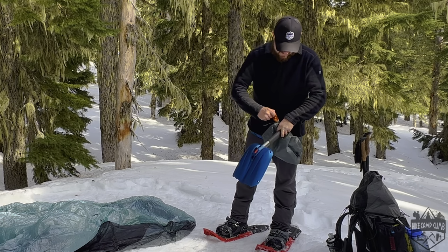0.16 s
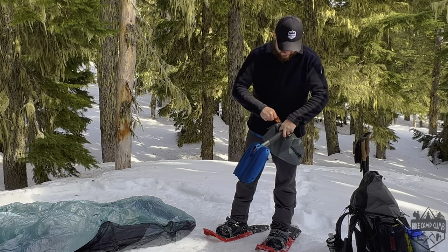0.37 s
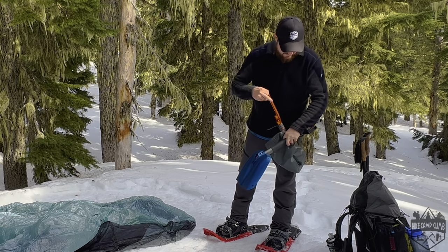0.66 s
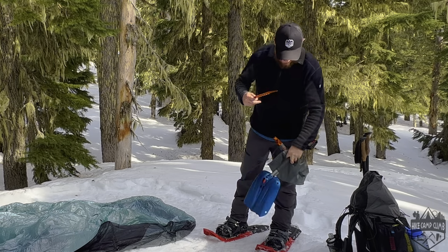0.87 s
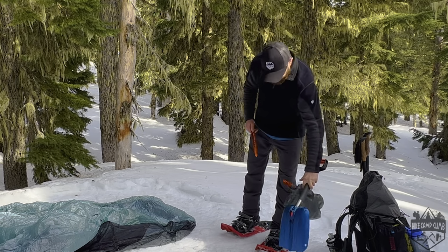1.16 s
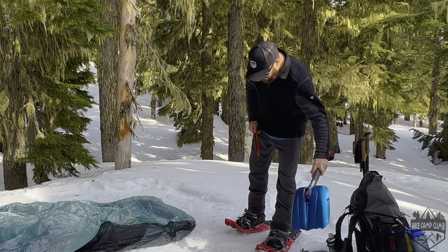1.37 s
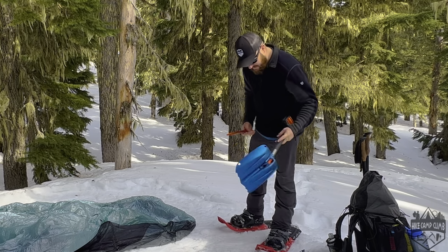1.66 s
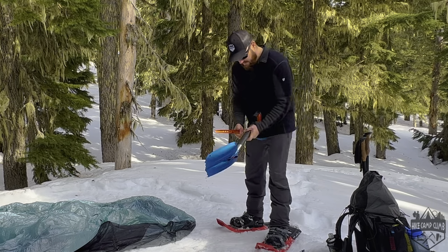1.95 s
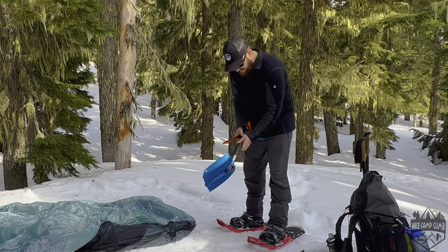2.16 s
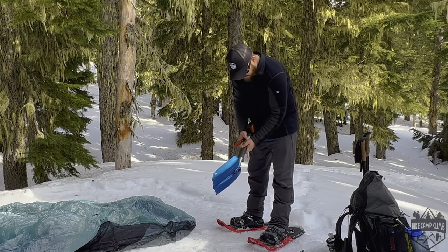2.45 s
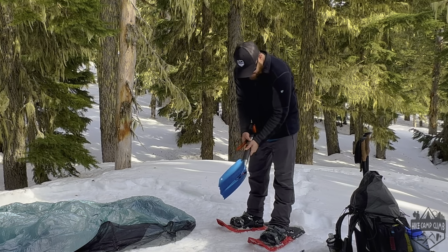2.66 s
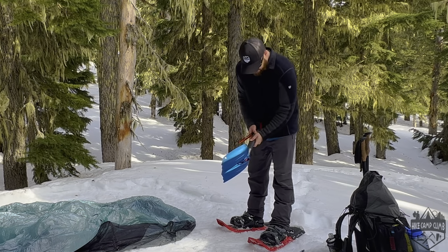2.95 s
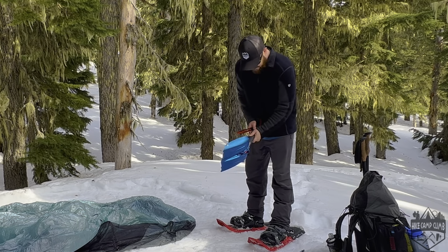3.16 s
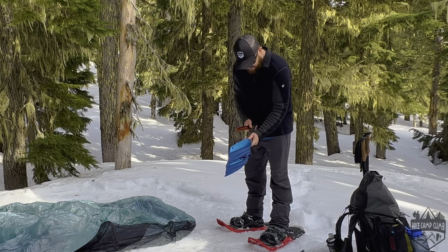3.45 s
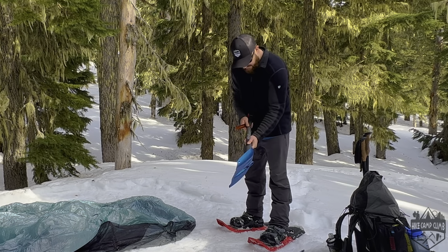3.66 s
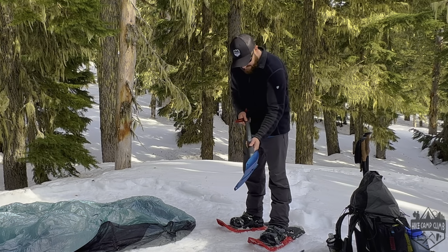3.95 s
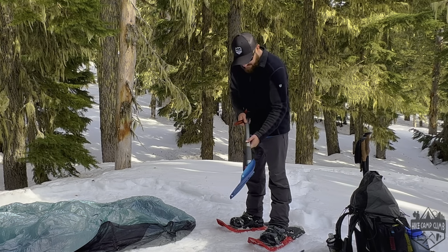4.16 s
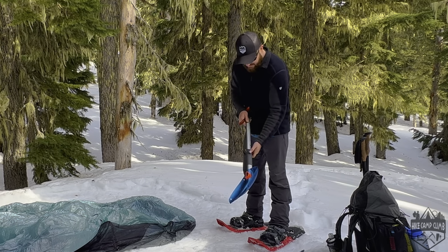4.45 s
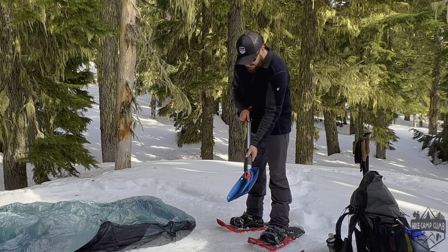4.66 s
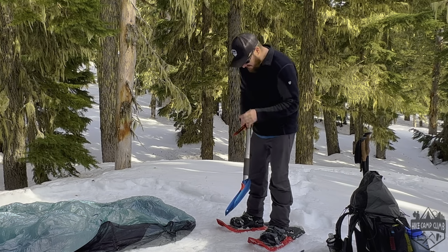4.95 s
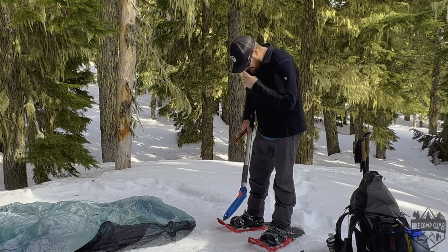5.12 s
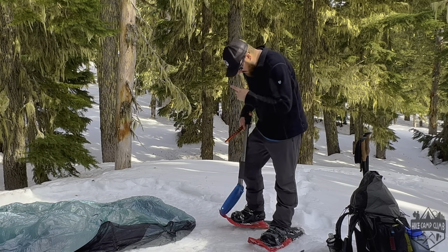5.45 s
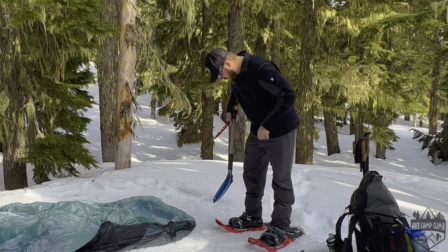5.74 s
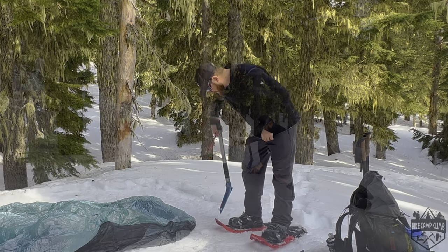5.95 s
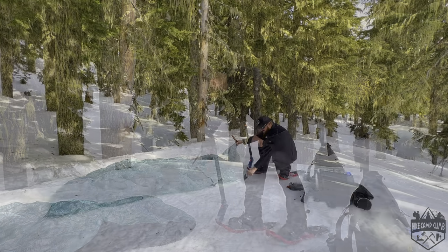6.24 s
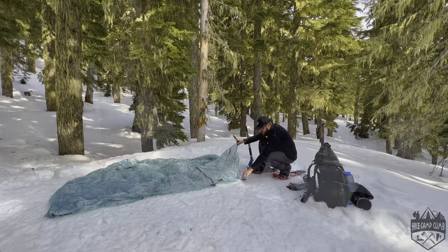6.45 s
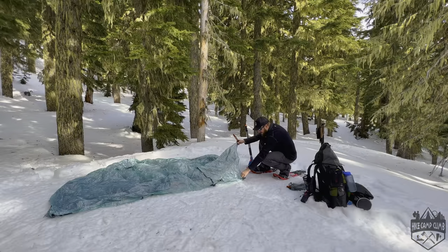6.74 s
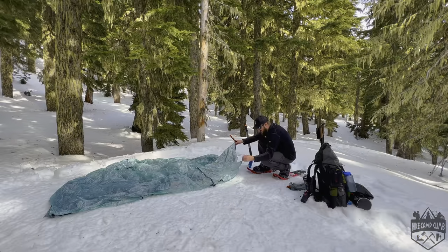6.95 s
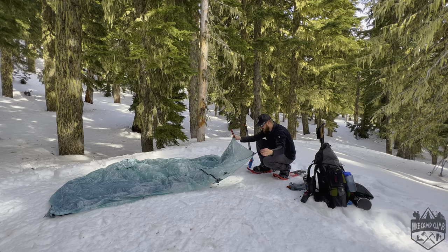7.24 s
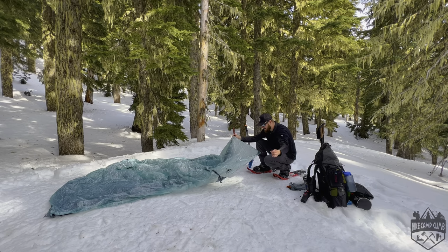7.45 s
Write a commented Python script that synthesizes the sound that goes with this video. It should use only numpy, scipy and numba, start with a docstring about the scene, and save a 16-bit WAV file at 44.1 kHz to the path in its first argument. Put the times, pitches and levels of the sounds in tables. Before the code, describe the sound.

Close outdoor handling of a metal shovel: hollow clanks, sharp clicks, gritty fabric and snow scrapes, a few soft thuds, then quiet nylon rustling and a fast ratchet.

```python
"""Shovel and nylon gear in a snowy forest

A camper on snowshoes handles a small metal shovel and nylon gear, two metres from a pair of microphones.
Cloth and snow crust rustle as filtered grit, and the shovel clanks as a bank of decaying modes.
Dull thuds sink in pitch, hard contacts tick and a cord ratchets tooth by tooth.
Wind rumbles and puffs, louder on the left microphone, over a faint forest hiss."""
import sys
import numpy as np
from scipy import signal
from scipy.fft import rfft, irfft
from scipy.io import wavfile
from scipy.ndimage import uniform_filter1d
from numba import njit

SR = 44100
rng = np.random.default_rng(int(sys.argv[2]) if len(sys.argv) > 2 else 0)


def dump_mix(stems):
    """Bounce the given channels to the path in sys.argv[1] as a 16-bit WAV at rate SR."""
    frames = np.atleast_2d(stems).T  # one column per channel
    limited = np.clip(frames, -1, 1)  # hard clip at full scale
    pcm = np.round(limited * 32767).astype(np.int16)
    wavfile.write(sys.argv[1], SR, pcm)


N = 334278  # samples

# Resonances of rubbed cloth and crust, middle band. Each row: centre in Hz, width in Hz, level in dB.
RUB_MID = [(1450, 595, 0), (2480, 1870, -2), (4460, 2140, -4.5)]
# The same for the high band. Each row: centre in Hz, width in Hz, level in dB.
RUB_HIGH = [(5520, 1650, -3), (7215, 1480, 4), (7930, 3180, 0.5), (12310, 2300, -6), (15050, 1000, -17.5)]
# Modes of the shovel. Each row: pitch in Hz, level in dB, time to fall 60 dB when free, in seconds.
SHOVEL = [(393, -15, 1.5), (430, -9, .25), (619, -9, 1.8), (760, -10, .06), (826, -10, .2), (857, -15, 1.),
          (875, -8, .6), (1050, -16, 1.), (1206, -10, 1.1), (1287, -9, .42), (1400, -5, .25),
          (1599, -6, .6), (1803, -12, .4), (2482, -9, .35), (2536, -12, .45), (2580, -16, .4),
          (2900, -14, .15), (3321, -8, .35), (1863, -6, .2), (1938, -6, .16), (2320, -9, .1),
          (2640, -9, .12), (3838, -8, .08), (4540, -6, .1), (4840, -12, .11), (5890, -12, .08),
          (6717, -12, .08), (9320, -16, .06), (11430, -12, .06), (12090, -15, .06)]


def undb(db):
    """Amplitude factor of a level in dB."""
    return 10 ** (np.asarray(db) / 20)


def level(x, db):
    """Scale a sound to an RMS level in dB."""
    return x * undb(db) / np.sqrt(np.mean(x ** 2))


def curves(table):
    """Columns of a table against its first, in seconds, as one value a sample."""
    s, *columns = np.transpose(table)
    return [np.interp(np.arange(N) / SR, s, c) for c in columns]


def add(out, s, sound):
    """Mix a short sound in at s seconds."""
    i = int(s * SR)
    out[i:i + len(sound)] += sound[:N - i]


def resonate(x, peaks):
    """Band-pass resonances side by side, signs alternating."""
    total = 0
    for k, (hz, width, db) in enumerate(peaks):
        band = signal.lfilter(*signal.iirpeak(hz, hz / width, SR), x)
        total = total + (-1) ** k * undb(db) * band
    return total


@njit
def svf(x, hz, q):
    """State-variable band-pass whose centre moves; gain 1 at the centre."""
    y, b, l = np.empty(len(x)), 0., 0.
    for i in range(len(x)):
        g = np.tan(np.pi * hz[i] / SR)
        v = (b + g * (x[i] - l)) / (1 + g * (g + 1 / q))
        b, l, y[i] = 2 * v - b, l + 2 * g * v, v / q
    return y


def walk(rate):
    """Random levels held 1 / rate s and slewed twice; spread near 1."""
    k = int(SR / rate)
    held = np.repeat(rng.standard_normal(N // k + 1), k)
    return 1.64 * uniform_filter1d(uniform_filter1d(held, k), k)[:N]


def grit(spread_db, flicker_db):
    """Dense slips of very uneven size, in quick clusters."""
    size = np.minimum(rng.exponential(size=N), 5)
    flicker = np.clip(walk(90), -2, 2)
    return rng.standard_normal(N) * undb(spread_db * size + flicker_db * flicker)


def wind():
    """Low rumble of air on the ports, louder left, with single puffs of two or three swings."""
    # Mean rumble before flicker and gain. Each row: time in seconds, level in dB.
    rumble = [(0.0, -52), (0.23, -51), (0.31, -42), (0.8, -41.5), (1.03, -28), (1.09, -44.5), (1.38, -38.5),
              (1.48, -58), (1.8, -42), (2.05, -42.5), (2.33, -59.5), (2.9, -60), (3.1, -68), (3.57, -66.5),
              (3.63, -49), (3.95, -56), (4.2, -43.5), (4.27, -57), (4.49, -60), (4.58, -42.5), (4.7, -45),
              (4.75, -63), (4.93, -61), (5.12, -52), (5.3, -60.5), (5.7, -57.5), (6.4, -59.5),
              (7.58, -59.5)]
    # Single puffs before gain. Each row: start in seconds, slope at the start in dB, pitch in Hz.
    puff_rows = [(0.468, -17, 80), (0.751, -21, 77.6), (0.888, -13.5, 87), (0.966, -7.5, 83.3),
                 (1.023, -5, 79), (3.947, -25, 79.6)]

    def air_noise():
        noise = resonate(rng.standard_normal(N), [(50.0, 28.5, 0)])
        return level(resonate(noise, [(53.0, 50, 0)]), 0)

    common, own = air_noise(), air_noise()
    gust = undb(curves(rumble)[0] + 2 * walk(11))
    puffs, t = np.zeros(N), np.arange(SR // 8) / SR
    for s, db, hz in puff_rows:
        swing = np.sin(2 * np.pi * hz * (t + 0.0018 * (1 - np.exp(-t / 0.003))))  # quicker at first
        add(puffs, s, undb(db) * t / 0.0094 * np.exp(-t / 0.0074) * swing)
    late_puffs = np.roll(puffs, 90)  # 2 ms later on the right
    right = undb(-10) * (gust * (0.75 * common + .9 * own) + late_puffs)
    return undb(4.0) * np.array([gust * common + puffs, right])


def air():
    """The faint hiss of the forest: noise shaped by a fixed spectrum."""
    # Spectrum shape, scaled as a whole afterwards. Each row: frequency in Hz, relative density in dB.
    spectrum = [(59, -39), (100, 5.5), (200, -1), (337, -3), (620, -23.5), (7200, -28.5), (10500, -19.5),
                (12400, -50), (15000, -58)]
    hz, db = np.transpose(spectrum)
    shape = np.interp(np.log(np.arange(1, N // 2 + 2) * SR / N), np.log(hz), db)
    return level(irfft(rfft(rng.standard_normal(N)) * undb(shape), N), -65.5)


def thuds():
    """A dull blow on packed snow: the highs arrive first and the pitch falls."""
    # Each row: start in seconds, level in dB, pitch in Hz that the sag starts from, 60 dB fall in seconds.
    blows = [(1.776, -11.5, 107, 0.054), (1.913, -16.5, 107, 0.063), (2.804, -17, 111, 0.046),
             (2.87, -33, 106, 0.055), (4.6398, -17.5, 108, 0.042), (5.127, -4.5, 124, 0.053)]
    sag_s = 0.083  # the last pitch keeps sinking
    tail_db, tail_t60_s = -18.5, 0.18  # the packed snow shudders on
    out, t = np.zeros(N), np.arange(SR // 5) / SR
    for s, db, hz, t60 in blows:
        pitch_hz = hz * np.exp(-t / sag_s) + 500 * np.exp(-t / 0.00455) + 1500 * np.exp(-t / 0.00129)
        tone = np.sin(2 * np.pi * np.cumsum(pitch_hz) / SR)
        blow = undb(-60 * t / t60) * (1 - np.exp(-t / 0.0031)) * tone
        shudder = resonate(rng.standard_normal(len(t)), [(70, 94, 2.0), (255, 220, 2.4)])
        tail = level(shudder, tail_db) * undb(-60 * t / tail_t60_s) * (1 - np.exp(-t / 0.015))
        add(out, s, undb(db) * (blow + tail))
    return out


def ratchet():
    """A cord or zip jumps tooth by tooth: one faint jump, a quickening run that starts shy, then a few more."""
    # Single jumps of the cord, before the resonances. Each row: start in seconds, level in dB.
    jumps = [(6.8255, -44), (6.996, -33), (7.006, -35), (7.0454, -39)]
    run_s, teeth, run_db, shy_db = 6.845, 11, -37.5, -6
    gap_s, extra_gap_s, settle_teeth = .0113, .0058, 2.0  # the pull speeds up over the first teeth
    out, start = np.zeros(N), np.exp(-np.arange(teeth) / settle_teeth)
    gaps = gap_s * (1 + 0.027 * rng.standard_normal(teeth)) + extra_gap_s * start
    run = zip(run_s + np.cumsum(gaps) - gaps, run_db + shy_db * start)
    for s, db in [*jumps, *run]:
        add(out, s, level(rng.standard_normal(200) * np.exp(-np.arange(200) / 16), db))
    return 1.66 * resonate(out, [(4200, 2600, 1.0), (6030, 1400, 5.0), (9100, 2900, -2.0)])


def ticks():
    """Hard contacts of metal on metal or ice; each row is a few swings at one pitch."""
    # Each row: start in seconds, level in dB (raised 3 dB below), pitch in Hz, 60 dB fall in seconds.
    contacts = [(1.383, -5, 7000, .006), (1.3837, -7, 7250, .004), (1.3494, -26, 5030, 0.0071),
                (2.184, -26, 2520, 0.0092), (2.3738, -18.5, 3830, .012), (2.7076, -26.5, 2690, 0.026),
                (2.7078, -29, 4500, 0.029), (2.708, -28, 6000, 0.016), (2.7135, -28, 2660, .015),
                (2.8095, -29, 2000, 0.0072), (2.803, -22, 1300, .008), (2.8047, -15, 1820, 0.0056),
                (2.8848, -28.5, 2480, 0.011), (3.2267, -3.5, 6360, 0.0044), (3.2267, -12, 3460, 0.0065),
                (3.8416, -12, 6560, 0.0069), (3.8417, -13.5, 12000, 0.0095), (3.844, -18, 1870, 0.007),
                (4.299, -54, 3400, .07), (4.6405, -26.5, 1650, 0.0078), (4.66, -29, 1720, 0.0092),
                (4.66, -37.5, 4000, 0.0073), (5.126, -15, 1900, 0.0058), (6.0133, -4, 11900, .003)]
    out, t = np.zeros(N), np.arange(SR // 10) / SR
    for (s, db, hz, t60), turn in zip(contacts, rng.uniform(0, 2 * np.pi, len(contacts))):
        envelope = undb(db + 3 - 60 * t / max(t60, .002)) * (1 - np.exp(-t * hz))
        add(out, s, envelope * np.sin(2 * np.pi * hz * t + turn))
    return out


def cracks(table):
    """Short gritty bursts (s, dB, treble share dB, t60 s, body Hz), scaled by their first milliseconds."""
    spike, spike_s = 0.28, 0.00028  # the first instant stands above the rest
    out, t = np.zeros(N), np.arange(SR // 4) / SR
    broad = resonate(grit(2.0, 2.9), RUB_MID + [(750, 200, 0.0)])
    bright = resonate(grit(6.8, 3.5), RUB_HIGH)
    for s, db, treble_db, t60, hz in table:
        i = min(int(s * SR), N - len(t))
        cut = broad[i:i + len(t)]
        bands = np.array([cut + 2.0 * resonate(cut, [(hz, 0.33 * hz, 0)]), bright[i:i + len(t)]])
        body, treble = bands / bands[:, :SR // 300].std(axis=1, keepdims=True)
        burst = undb(-6.0) * body + undb(treble_db) * treble
        attack = (1 - np.exp(-t / 0.00053)) * (1 + spike * np.exp(-t / spike_s))
        add(out, s, burst * undb(db - 60 * t / max(t60, .005)) * attack)
    return out


def snaps():
    """Dry cracks of cloth and crust, and a few short knocks of the shovel blade: gritty bursts with one body
    resonance each."""
    # Each row: start in seconds, crack in dB, treble share in dB, 60 dB fall in seconds, body in Hz.
    snap_rows = [(0.2528, -40.5, 11, 0.02, 1270), (0.332, -41, -1.5, 0.13, 1490),
                 (0.3815, -43.5, 15.5, 0.035, 3960), (0.4074, -44, 15.5, 0.016, 2310),
                 (0.4374, -51, 1, 0.039, 3320), (0.598, -31, 0, 0.042, 4350),
                 (0.6425, -33.5, 16, 0.027, 3500), (0.679, -27, 12, 0.012, 3500),
                 (0.787, -37.5, -3.5, 0.015, 3000), (0.807, -38, -22, 0.057, 620),
                 (0.878, -36.5, -12, 0.034, 3500), (1.1584, -17, -29, 0.038, 1300),
                 (1.3494, -17, -5.5, 0.024, 1620), (1.3826, -26.5, 15, 0.036, 3310),
                 (1.7789, -17, -6.5, 0.067, 1750), (1.915, -16.5, -9.5, 0.055, 1660),
                 (2.339, -49, -7, 0.0057, 1580), (2.354, -31, -14, 0.019, 2500),
                 (2.365, -29, -8, 0.015, 4500), (2.4598, -34.5, -39, 0.068, 2600),
                 (2.506, -37, -34, 0.02, 800), (2.803, -18.5, -45, 0.012, 1520),
                 (2.8095, -34, -33, 0.016, 1870), (2.868, -36, -23, 0.017, 1560),
                 (3.141, -30, -23, 0.27, 1380), (3.2204, -18.5, 3, 0.032, 1490),
                 (3.2499, -34, 0, 0.02, 5500), (3.263, -33, 4, 0.02, 5000), (3.287, -28.5, -11, 0.12, 4960),
                 (3.308, -34, -6, 0.02, 4500), (4.6399, -26, -18, 0.013, 1830),
                 (4.7805, -45, -23, 0.035, 1630), (5.128, -10, -5.5, 0.055, 603),
                 (5.204, -41, -26, 0.065, 545), (5.8384, -30.5, -19, 0.031, 1720),
                 (5.8691, -28, -20, 0.024, 1860), (5.8814, -38, -16, 0.032, 2430),
                 (6.284, -26.5, -3.5, 0.014, 2200), (6.399, -36.5, -7, 0.071, 4290),
                 (6.506, -34, -33, 0.021, 4230), (6.6189, -33, -7, 0.057, 1570),
                 (6.9852, -27, -1, 0.049, 2630), (7.0274, -23, -4.5, 0.028, 4630),
                 (7.087, -28, 2.5, 0.052, 5200), (7.1794, -46, -10, 0.031, 1490),
                 (7.1965, -28, -15, 0.026, 1380)]
    return cracks(snap_rows)


def clanks():
    """Each row rings the shovel's modes, strongest near one pitch; one knock may take several rows."""
    # Each row: start in seconds, crack in dB, its treble share in dB, ring in dB, most excited pitch in Hz,
    # boost there in dB, share of the blade modes in dB, freedom from the grip (0 held, 1 free, or longer).
    contact_rows = [ (0.66, -29, 9, -34.5, 1287, 21.5, -6, 0.76),
                    (0.6605, -37, -20, -41, 1600, 17, -8, 0.15), (0.711, -31, -20, -42, 1600, 8, 2, 0.19),
                    (0.8037, -42, -16, -53, 1287, 19, -9, 1.5), (1.1186, -17, -8, -32, 1287, 12.5, -20, 1),
                    (1.587, -23.5, -30, -34.5, 1630, 12, 9.5, 0.12),
                    (1.8475, -10, -15, -21, 1910, 7, -27, 0.44), (1.851, -11.5, -33, -42, 3838, 11, -14, 0),
                    (1.8584, -17, -30, -38.5, 4540, 25, -17, 0.6),
                    (1.865, -12, -34, -43, 1930, 24, -18, 0.6), (2.1836, -18, -9, -34, 850, 13, -18, 0.38),
                    (2.373, -16, -5, -44, 2900, 22, -13, 0.5), (2.376, -29, -22, -40.5, 860, 21, -4, 0.23),
                    (2.381, -32, -25, -41, 1318, 15, -4.5, 0.6),
                    (2.4171, -27, -26, -47.5, 2330, 19, -17, 1), (2.42, -43, -26, -49, 1287, 15, -7, 0.53),
                    (2.7083, -25.5, -3, -42, 2690, 24, -8, 0.4), (2.712, -27, -25, -47, 2660, 8, -6, 0.6),
                    (2.746, -20.5, -32, -45, 1610, 11, -6, 0.66), (2.764, -25, -15, -47, 1940, 18, -8, 0.3),
                    (2.81, -38, -25, -56, 1900, 16, -11, 0.5), (2.8377, -26.5, -25, -56, 1900, 12, -7, 0.4),
                    (2.842, -36, -25, -50, 2700, 16, -12, 0.6),
                    (2.8848, -22.5, -17.5, -46, 1900, 8, -11, 0.68),
                    (2.9948, -47, -25, -45.5, 2440, 12, -13, 0.16),
                    (3.016, -42, -25, -49, 1350, 20, -8, 0.5), (3.0943, -50, -28, -46, 1600, 11, 2, 0.23),
                    (3.226, -17.5, 6.5, -43, 1896, 22, -18, 0.72),
                    (3.5518, -42, -31, -46.5, 2480, 9, -3, 0.53),
                    (3.8412, -13.5, 4, -26, 2520, 11.5, -3, 0.86), (3.8435, -7.5, -28, -27, 800, 17, 15, 0),
                    (3.847, -38, -20, -32, 1600, 12, -10, 0.97), (3.88, -40, -25, -45, 872, 17, 2, 0.7),
                    (4.082, -32, -9, -48, 870, 3.5, 12, 0.35), (4.2179, -28, -31, -39, 830, 12, -2, 0.14),
                    (4.223, -44, -32, -49.5, 2670, 20.5, -3, 0.8),
                    (4.3625, -28.5, -40, -36.5, 854, 17.5, -4.5, 0.16),
                    (4.371, -30, -31, -53, 2540, 18, -1, 0.38), (4.5284, -25, -33, -35, 861, 16.5, -6, 0.2),
                    (4.531, -40, -33, -46, 2580, 18, -14, 0.55),
                    (4.5537, -27, -10, -47, 2580, 17, -14, 0.47), (4.557, -36, -25, -45, 1600, 9, -13, 0.3),
                    (4.574, -23.5, -7.5, -44, 1600, 16, -8, 0.15), (4.59, -35, -3, -49, 2650, 13, -8, 0.35),
                    (4.601, -41, -22, -45, 1600, 14, -2, 0.15), (4.609, -45, -22, -56, 1600, 3, -4, 0.65),
                    (4.659, -27.5, -25, -44, 1640, 4, 6, 0.11),
                    (4.7998, -37, -28, -38.5, 876, 21.5, -13, 0.14),
                    (6.011, -21, 13, -30, 1890, 19.5, -19, 0.5),
                    (6.0196, -10, -13, -34.5, 4540, 23.5, -18, 1),
                    (7.093, -52, 0, -42.5, 2320, 31.5, -24.5, 0.33)]
    shake_db, shake_rad, shake_s = 3.5, 0.8, 0.04  # the level shakes fully after shake_s
    settle, settle_s = 0.0012, 0.012  # a mode starts flat and settles: phase lag in radians per Hz
    grip_s = 0.24  # the hand closes on the metal this long after a row starts
    out = cracks([(*row[:3], 0.023, row[4]) for row in contact_rows])  # 60 dB fall in 23 ms
    t = np.arange(SR // 2) / SR
    hz, mode_db, ring_t60 = np.transpose(SHOVEL)[:, :, None]
    on_blade = hz < 1250  # the lower modes belong to the broad blade
    grip_db_per_s = np.where(hz < 700, 500, 120)
    spread = np.array([1, np.pi])[:, None, None]
    chance = rng.standard_normal((len(contact_rows), 2, len(SHOVEL), 1)) * spread
    tremor, steps = walk(60), np.arange(len(t))
    starts = rng.integers(0, N - len(t), chance.shape)
    for row, (size, turn), start in zip(contact_rows, chance, starts):
        s, _, _, ring_db, spot_hz, boost_db, blade_db, free = row
        reach_db = boost_db * np.exp(-(np.log2(hz / spot_hz) / .06) ** 2) + blade_db * on_blade
        held_t60 = ring_t60 * np.maximum(free ** np.where(hz < 700, 2, 1), .04)
        fade_db = -60 * t / held_t60 - grip_db_per_s * np.maximum(t - grip_s, 0)
        # loose parts and the hand shake each mode's level and phase; held metal wavers more
        loose = min(free, 1)
        shake = tremor[start[0] + steps] * np.minimum(t / shake_s, 1)
        fade_db = fade_db + shake_db * (1 - 0.71 * loose) * shake
        turn = turn + shake_rad * (2.5 - 2.4 * loose) * tremor[start[1] + steps]
        turn = turn + settle * hz * np.exp(-t / settle_s)
        gain = undb(ring_db + mode_db + reach_db + 1.5 * size + fade_db)
        build_up = 1 - np.exp(-t * hz / 1.2)  # over a few cycles
        add(out, s, (build_up * gain * np.sin(2 * np.pi * hz * t + turn)).sum(axis=0))
    return out


def strokes():
    """Each stroke swells, holds and fades; powers add and weight the mean pitch of the hollow."""
    # Strokes of cloth and crust. Each row: full strength at seconds, swell rate in 1/s, hold in seconds,
    # fade rate in 1/s, level in dB, low, high and shovel-metal shares in dB, centre of the hollow in Hz.
    stroke_rows = [ (0.0, 40, 0.0061, 30, -43, -8, -0.5, 1.5, 1920),
                   (0.156, 36, 0.0089, 14.5, -41.5, -14, 3.5, 8, 2280),
                   (.37, 19, 0.022, 39, -50, -10, 8, 3, 2300),
                   (.53, 16.4, 0.044, 43, -37, -15, 2.5, -3, 1830),
                   (.602, 100, 0.046, 38, -40.5, -23, 13, -12, 3470),
                   (.665, 33, 0.03, 24.5, -39, -5.5, -8, -7, 1330),
                   (0.971, 27, 0.029, 8.1, -32.5, -4.5, -2, -17, 1750),
                   (1.139, 16.5, 0.072, 19, -30, -5, 0.5, 8.5, 1620),
                   (1.245, 36, 0.027, 28, -31, -2.5, -10, 6, 1600),
                   (1.37, 18, 0.0038, 15.4, -36.5, 0.5, 4, -8, 2600),
                   (1.603, 13, 0.032, 15, -40.5, 1, -2.5, -12, 1700),
                   (1.709, 41, 0.0095, 53, -28.5, -3.5, -5.5, 6.5, 2010),
                   (1.794, 170, .005, 14, -44, 8, -9, -8, 1940),
                   (1.856, 28, 0.091, 5.6, -38.5, -1.5, -38, -20, 1790),
                   (2.101, 12.9, 0.019, 61, -26.5, -10.5, 1, 4, 2470),
                   (2.19, 57, 0.0067, 61, -32, -1.5, -0.5, -12, 2000),
                   (2.378, 92, 0.0091, 28, -36, -22, -11, -16, 2900),
                   (2.721, 130, 0.027, 21, -41.5, -19, -15, -15, 2370),
                   (2.868, 20, .005, 24, -44.5, -0.5, -13, -17, 1760),
                   (3.045, 42, .005, 23, -49.5, 2, -21, 1, 1550),
                   (3.17, 70, 0.044, 9.6, -32.5, -13.5, -8, -0.5, 2370),
                   (3.31, 30, .02, 14.5, -44, -27, -5, -7, 5000),
                   (3.56, 45, .005, 10, -63, 9, -24, -6, 1890),
                   (3.69, 47, 0.042, 31, -31, -43, -11.5, -1, 1840),
                   (3.77, 33, 0.065, 16.7, -30.5, -31, 0, -3, 2460),
                   (3.868, 46, .005, 6.7, -37, -8.5, -13, -10, 1505),
                   (3.95, 20, 0.021, 9.5, -43, -20, -14, -20, 3940),
                   (4.22, 31, .005, 45, -57, 9, -29, -12, 1600),
                   (4.392, 80, 0.054, 17, -56, -13, 1.5, -28, 1750),
                   (4.57, 43, 0.008, 17, -43, 1.5, -25, -6, 1810),
                   (4.805, 28, .005, 40, -48, -7, -21, -5, 1710),
                   (5.132, 170, 0.014, 38, -48.5, 8.5, 10, -11, 1686),
                   (5.21, 21.4, 0.13, 26, -42, -2, -0.5, -16, 2260),
                   (5.53, 90, .004, 60, -39, -2, -10, 7, 1150),
                   (5.506, 19, 0.055, 27, -40, -19, -1.5, -9, 1950),
                   (5.6, 17, 0.017, 34, -29, -4.5, -4.5, 4, 1770),
                   (5.68, 46, .005, 8.8, -45.5, -13, -6.5, -11, 1660),
                   (5.9, 20, 0.065, 23, -43, -2.5, -0.5, -5, 2380),
                   (5.99, 20.6, 0.041, 40, -30, -19, 2.5, 5, 2500),
                   (6.022, 78, .005, 19.5, -26, -9.5, 6.5, 0, 2340),
                   (6.101, 26, 0.049, 21, -33, -11.5, 2, 4, 1710),
                   (6.165, 25, 0.047, 28, -33, -11.5, 1.5, 6, 2260),
                   (6.31, 28, .01, 16, -48.5, -5, -0.5, -10, 2120),
                   (6.45, 18, 0.027, 26, -49.5, -6, -12, -2, 2430),
                   (6.64, 76, 0.038, 70, -45, -3.5, -2.5, 5, 1850),
                   (6.79, 15, .01, 50, -48, -10, 0, -19, 2610),
                   (6.87, 40, .12, 34, -54.5, -18, -11, -20, 4300),
                   (6.97, 11.4, 0.13, 16, -45.5, 0, -2, -20, 2410),
                   (7.089, 24, 0.014, 85, -36, -19, 1, -15, 2380),
                   (7.22, 20, 0.039, 28, -53.5, 8, 0, -15, 900),
                   (7.15, 15, 0.13, 17, -48, 4.5, 3, -10, 1710),
                   (7.43, 20, 0.17, 23, -41.5, -1.5, -0.5, -16, 1900)]
    # The faint stir between strokes, one row: level in dB, the same three shares in dB, hollow in Hz.
    faint_stir = (-70, 8, 1, 0.5, 2006.5)
    t = np.arange(0, N + 64, 64) / SR
    rows = np.transpose([*stroke_rows, (0, 0, 0, 0, *faint_stir)])[:, :, None]
    s, swell, hold, fade, db, low_db, high_db, metal_db, hz = rows
    envelope = np.exp(-swell * np.maximum(s - t, 0) - fade * np.maximum(t - s - hold, 0))
    power = (undb(db) * envelope) ** 2
    gains = [np.sqrt(np.sum(power * undb(share) ** 2, axis=0)) for share in (0, low_db, high_db, metal_db)]
    hollow_hz = np.sum(power * hz, axis=0) / power.sum(axis=0)
    return [np.interp(np.arange(N) / SR, t, c) for c in (*gains, hollow_hz)]


def crumbs(hollow_hz):
    """Lumps of crust break one by one, each a short pop of uneven size near the pitch of the hollow."""
    per_s, spread_db = 260, 2
    size = undb(spread_db * np.minimum(rng.exponential(size=N), 3)) * rng.choice([-1., 1.], N)
    pops = size * (rng.random(N) < per_s / SR)
    hollow = svf(pops, hollow_hz * undb(2.0 * walk(60)), 2.7)  # the pitch wanders about the hollow
    return level(hollow + 0.35 * resonate(pops, RUB_MID), -8.5)


def rubbing():
    """Cloth and snow crust slip in tiny jerks; part of it runs through the shovel and colours it."""
    # Resonances of the low band. Each row: centre in Hz, width in Hz, level in dB.
    low_peaks = [(565, 830, 28), (187, 840, -21.5)]
    mid_gain, low_gain, high_gain, metal_gain, hollow_hz = strokes()
    low = level(resonate(resonate(grit(1.73, 1.9), [(542, 6500, 0)]), low_peaks), 0)
    mid = resonate(resonate(grit(2.9, 2.2), [(2340, 13000, 0)]), RUB_MID)
    mid = level(mid + 1.6 * svf(mid, hollow_hz, 0.47), -2.8)
    fine = resonate(grit(3.85, 1.76), [(7400, 9900, 0)])
    whole, top = resonate(fine, RUB_HIGH), resonate(fine, [(12170, 2400, -2.5)])
    brightness = (high_gain / undb(-35.5)) ** 0.3  # harder strokes hiss brighter
    high = (whole + top * brightness) / whole.std()
    held = [(hz, 3.4 / t60 + 12, mode_db) for hz, mode_db, t60 in SHOVEL]  # the grip widens the modes
    metal = resonate(grit(1.46, 0.92) * metal_gain, held) * undb(7.0)
    # crunch gathered in the hollow of the blade
    scoop = level(svf(svf(grit(4.1, 3.5), hollow_hz, 2.7), hollow_hz, 2.7), -12.5)
    metal = metal + metal_gain * scoop
    return mid_gain * (mid + crumbs(hollow_hz)) + low_gain * low + high_gain * high + metal


def ports(x):
    """Each microphone port hears its own phase and level, plus a scattered part redrawn every 46 ms."""
    # Each row: frequency in Hz, lead of the right port in radians, left minus right in dB,
    # likeness of the ports from 0 to 1 (raised to a power below).
    port_rows = [(0, 0, 1, .97), (170, .2, 1.5, .93), (400, .7, -1, .75), (700, 1.1, -2.5, .65),
                 (1200, 1.2, -5.5, .7), (2200, .75, -1, .65), (4300, .6, -2, .55), (5600, 3., 0, .25),
                 (6370, 5.7, 2, .45), (7600, 9.4, 3, .2), (9470, 15.9, -5, .45), (10500, 16, -3.5, .7),
                 (12060, 18.85, 0, .97), (13600, 21.9, 0, .93), (15680, 25.1, 0, .93)]
    hop, size = 2048, 8192  # samples
    hz, *columns = np.transpose(port_rows)
    bins = np.arange(size // 2 + 1)
    lead, pan_db, alike = (np.interp(bins * SR / size, hz, c) for c in columns)
    alike, side = np.clip(alike, 0, 1) ** 1.4, np.array([[1], [-1]])
    same, apart = np.sqrt((1 + alike) / 2), np.sqrt((1 - alike) / 2)
    t = np.arange(hop // 2) / SR
    centred = np.exp(-1j * np.pi * bins * hop / size)  # room before each piece for the phase lead
    x, out = np.pad(x, (hop, 2 * hop)), np.zeros((2, N + 3 * hop + size))
    for i in range(0, N + hop, hop):
        echo = level(rng.standard_normal(len(t)) * undb(-60 * t / 0.031), 0)
        scatter = rfft(echo / np.sqrt(len(t)), size)
        gain = (same + side * apart * scatter) * undb(side * pan_db / 2 + 1.5)
        piece = rfft(x[i:i + 2 * hop] * signal.windows.hann(2 * hop, sym=False), size)
        out[:, i:i + size] += irfft(piece * centred * gain * np.exp(-.5j * side * lead), size)
    return out[:, hop + hop // 2:][:, :N]


def scene():
    """The camper's sounds reach both ports and lean left or right; the wind blows on the ports themselves."""
    # The camper's hands move sideways. Each row: time in seconds, left minus right in dB.
    hands = [(0, -1), (1, 1), (1.7, 0), (2.5, 1.5), (3.5, 2), (4.2, 2.5), (5, 2), (6, 0.5), (6.7, 2.5),
             (7.58, 4.5)]
    camper = ports(rubbing() + clanks() + snaps() + thuds() + ticks() + ratchet() + air())
    return camper * undb(curves(hands)[0] * np.array([[.5], [-.5]])) + wind()


def record(dry):
    """The microphone chain cuts the deepest bass, rounds the loudest peaks and cuts the top."""
    top_hz = 15700
    dry = signal.sosfilt(signal.butter(2, 35, "high", fs=SR, output="sos"), dry)
    return signal.sosfilt(signal.ellip(8, .2, 70, top_hz, fs=SR, output="sos"), np.tanh(dry))


dry = scene()
out = record(dry)
dump_mix(out)
```